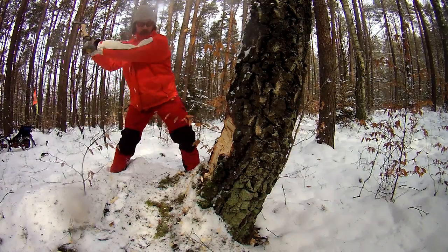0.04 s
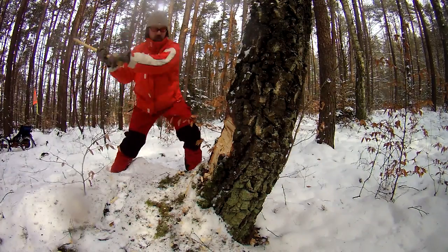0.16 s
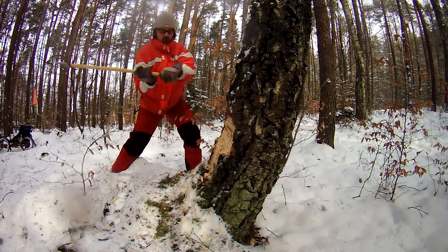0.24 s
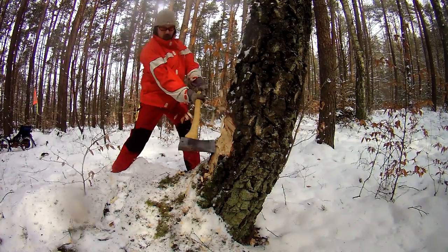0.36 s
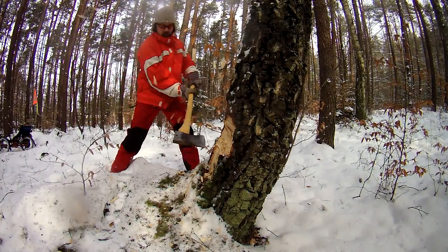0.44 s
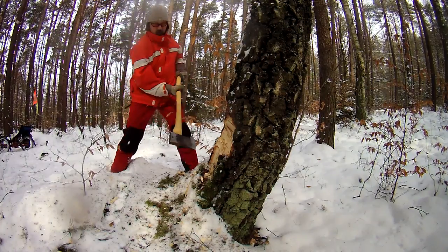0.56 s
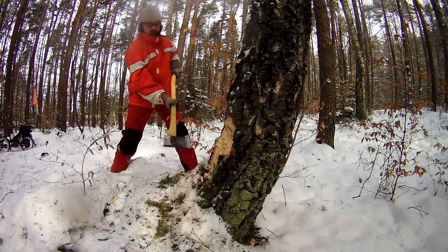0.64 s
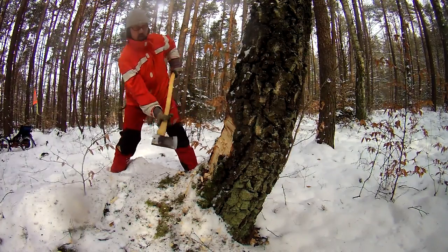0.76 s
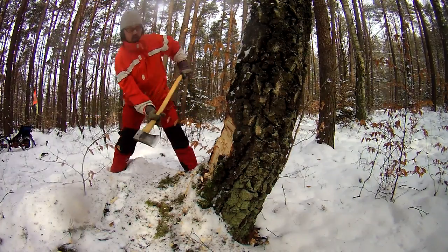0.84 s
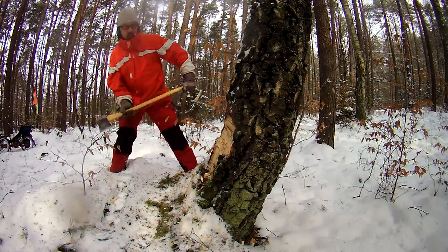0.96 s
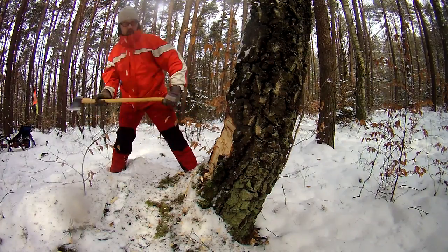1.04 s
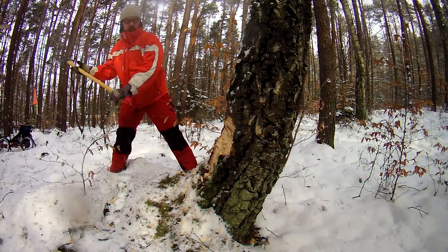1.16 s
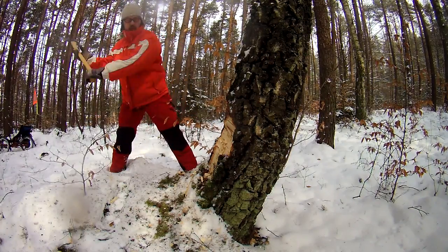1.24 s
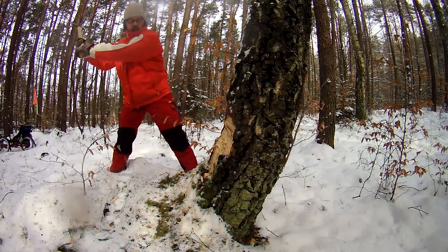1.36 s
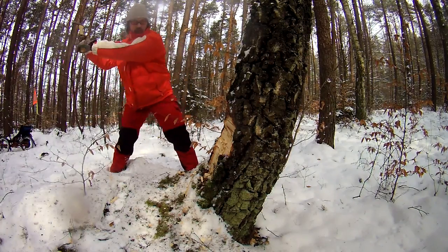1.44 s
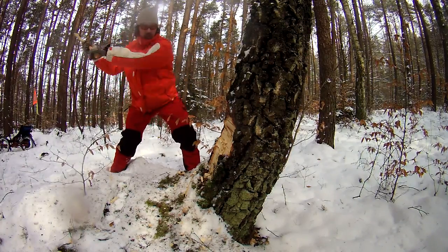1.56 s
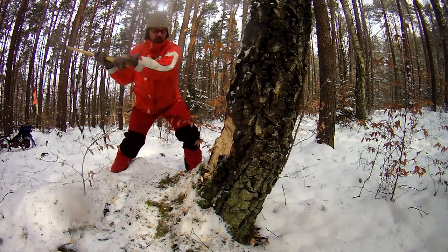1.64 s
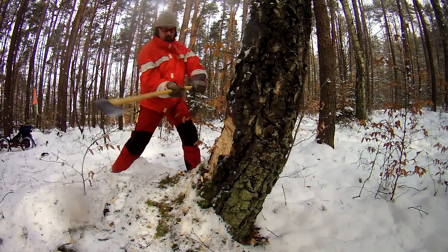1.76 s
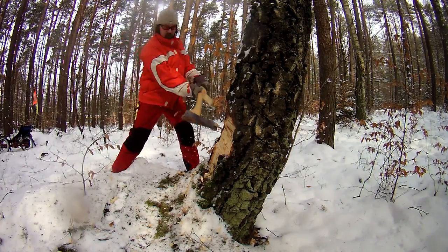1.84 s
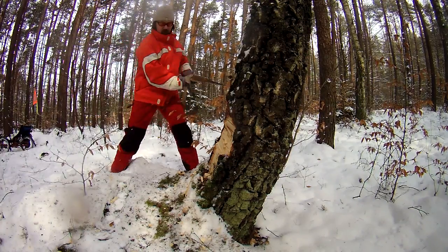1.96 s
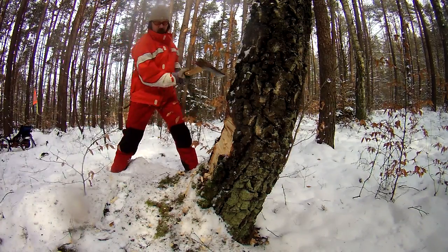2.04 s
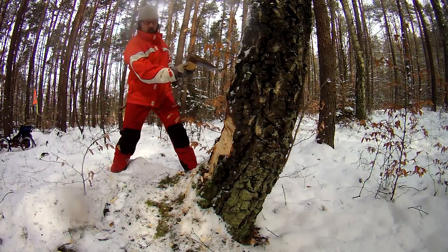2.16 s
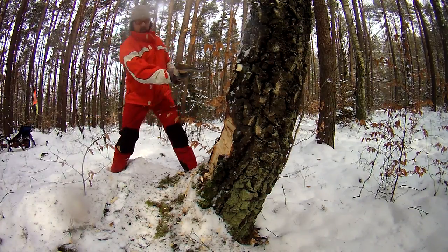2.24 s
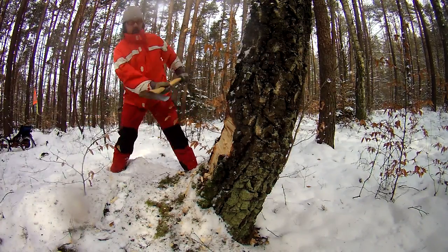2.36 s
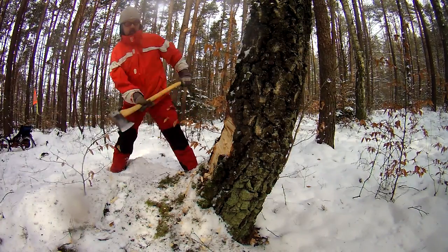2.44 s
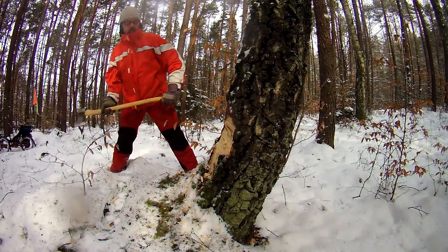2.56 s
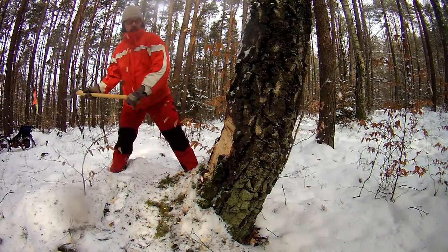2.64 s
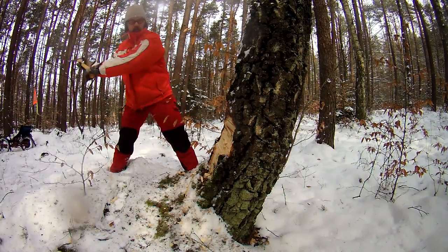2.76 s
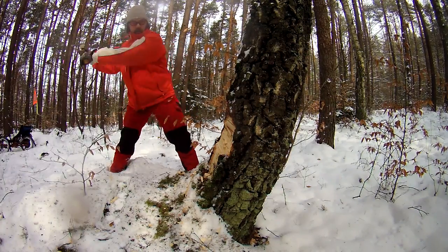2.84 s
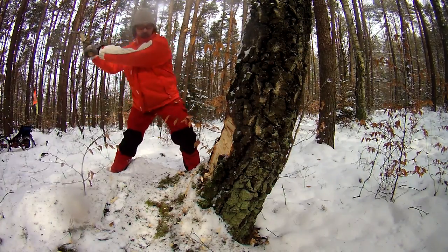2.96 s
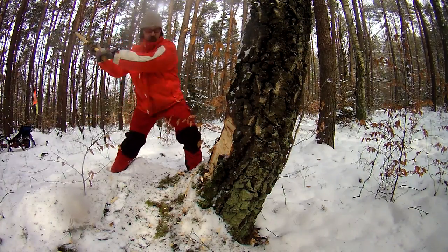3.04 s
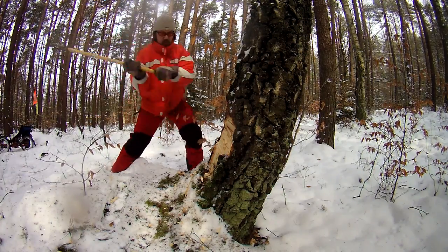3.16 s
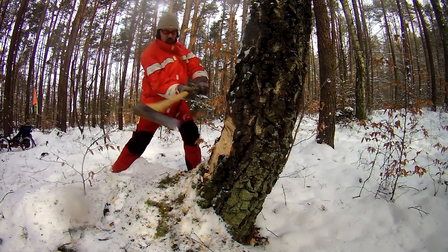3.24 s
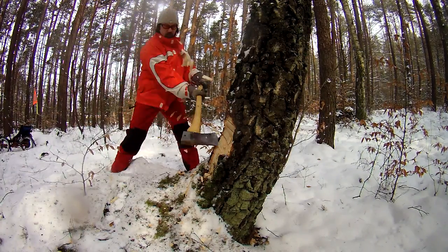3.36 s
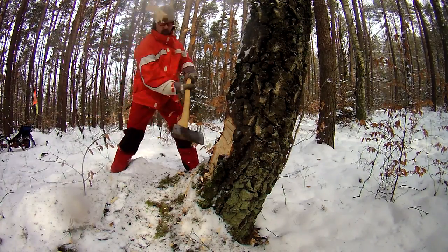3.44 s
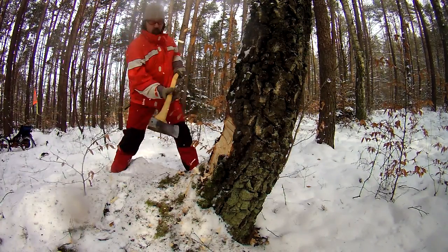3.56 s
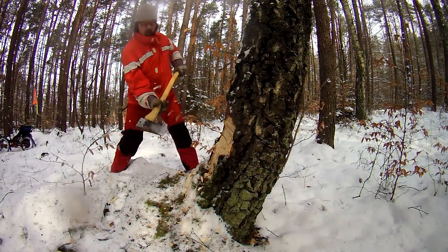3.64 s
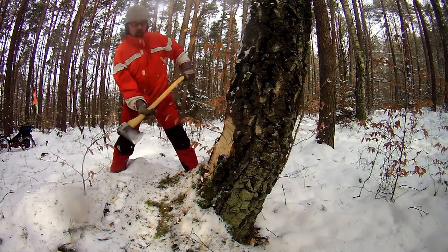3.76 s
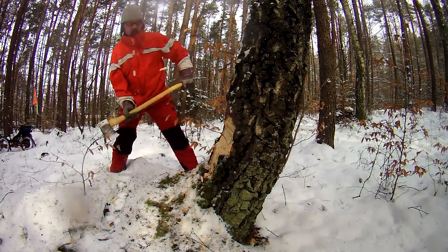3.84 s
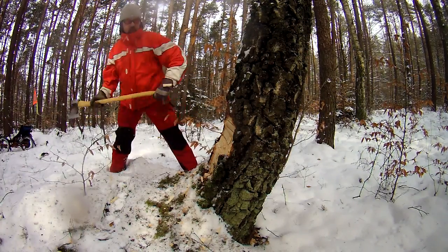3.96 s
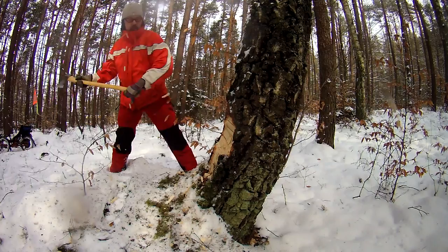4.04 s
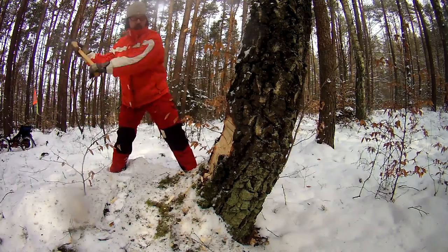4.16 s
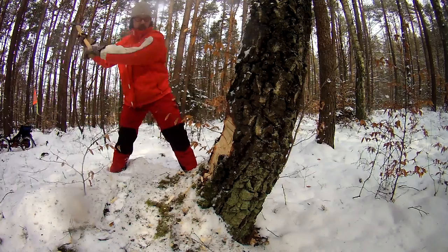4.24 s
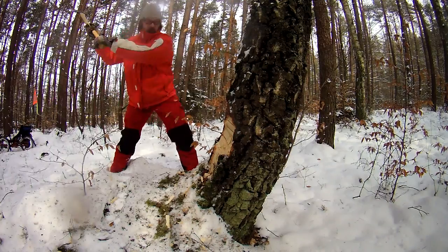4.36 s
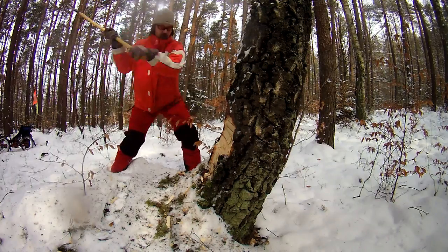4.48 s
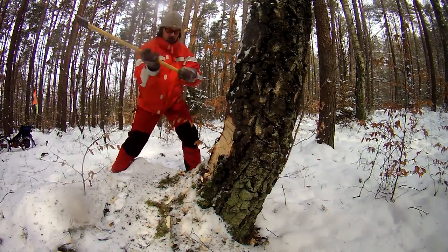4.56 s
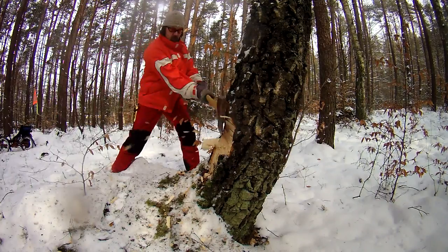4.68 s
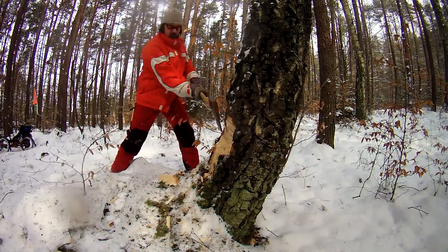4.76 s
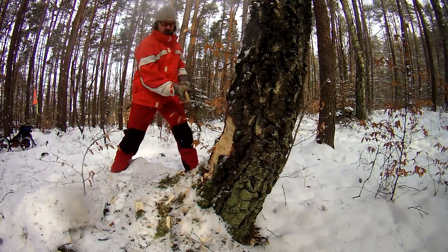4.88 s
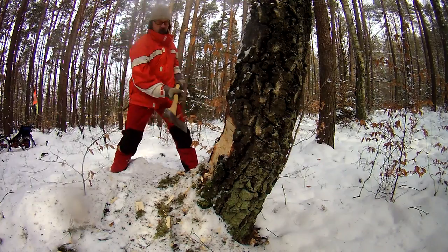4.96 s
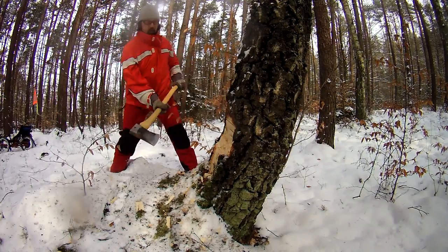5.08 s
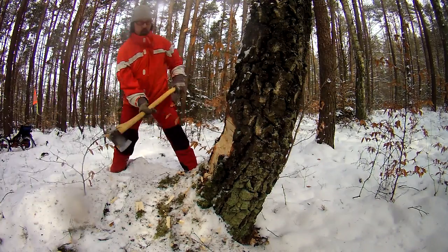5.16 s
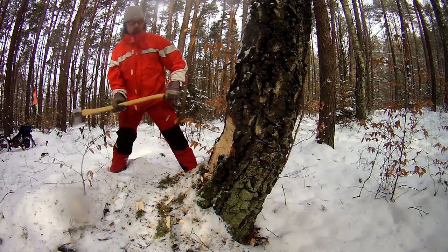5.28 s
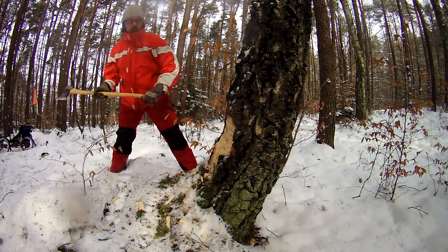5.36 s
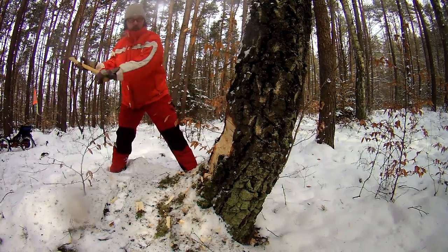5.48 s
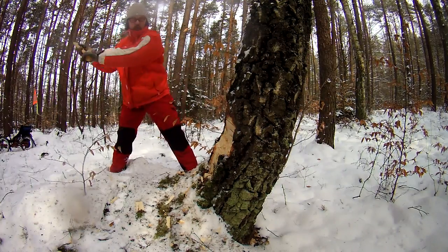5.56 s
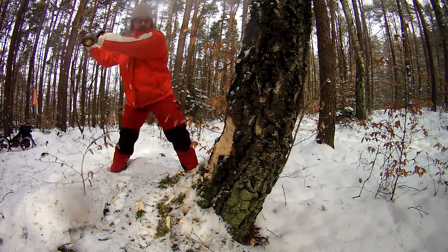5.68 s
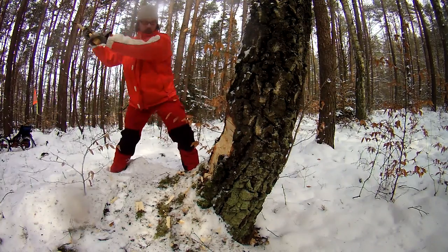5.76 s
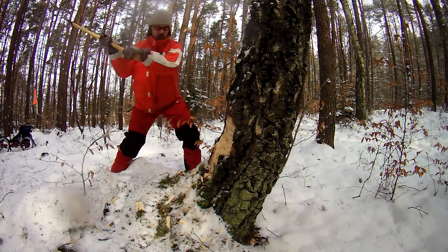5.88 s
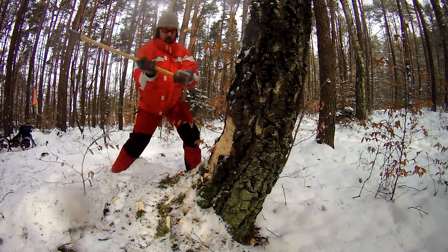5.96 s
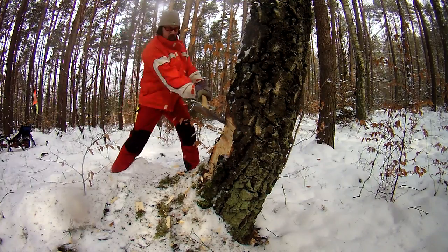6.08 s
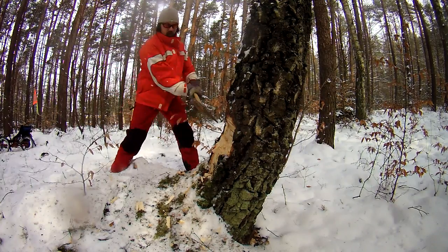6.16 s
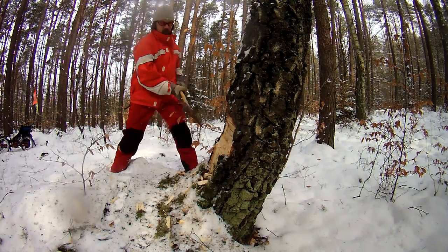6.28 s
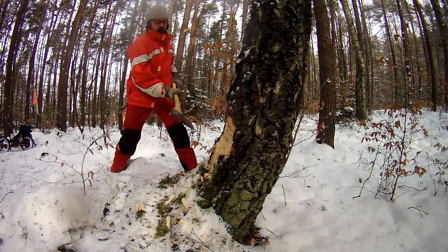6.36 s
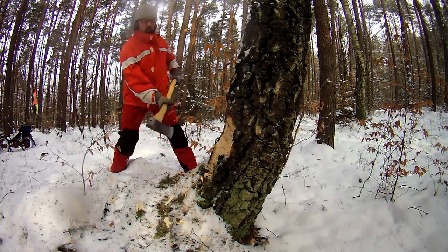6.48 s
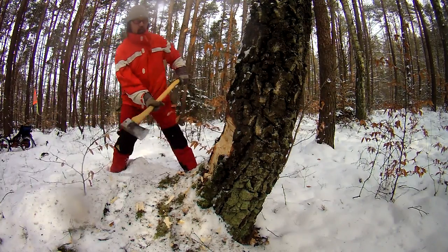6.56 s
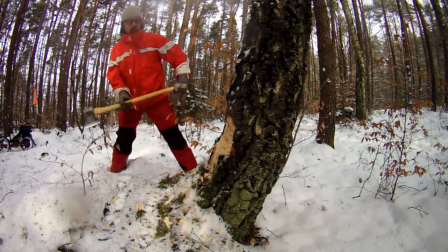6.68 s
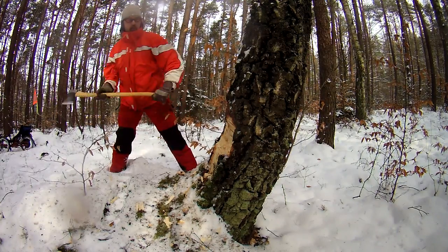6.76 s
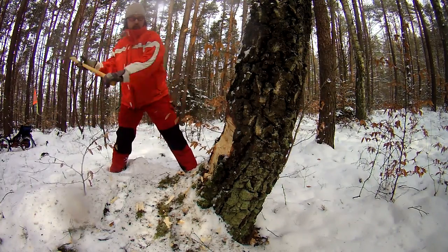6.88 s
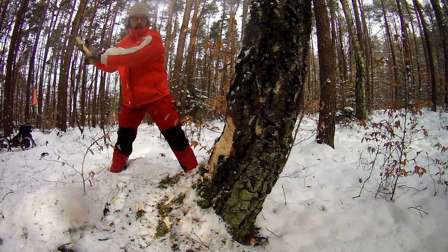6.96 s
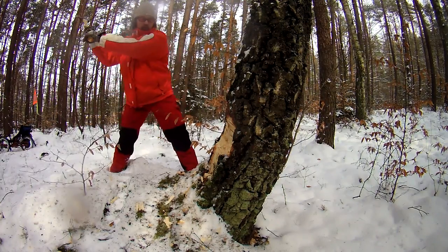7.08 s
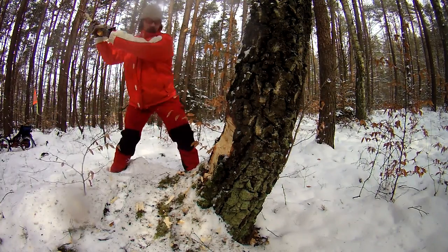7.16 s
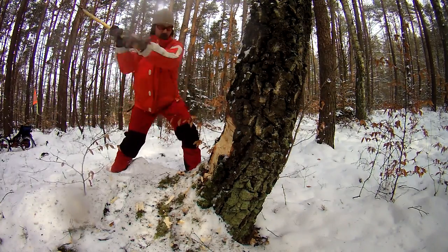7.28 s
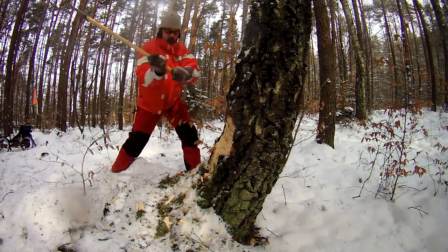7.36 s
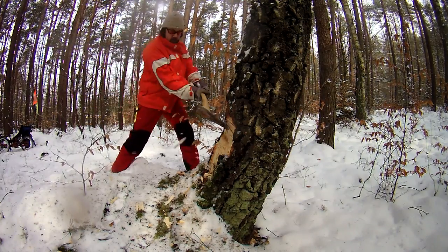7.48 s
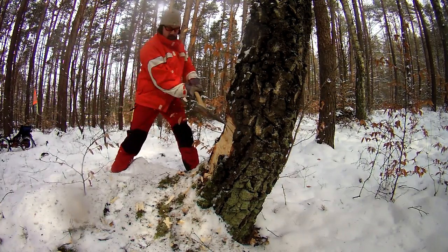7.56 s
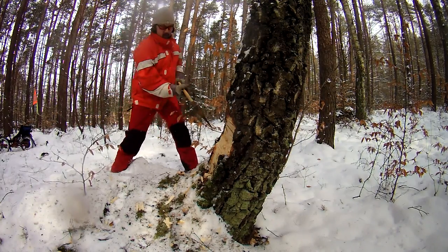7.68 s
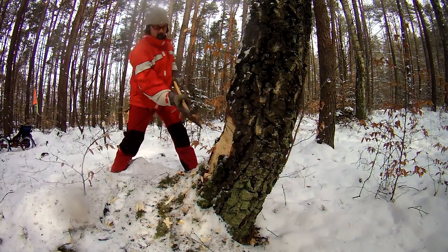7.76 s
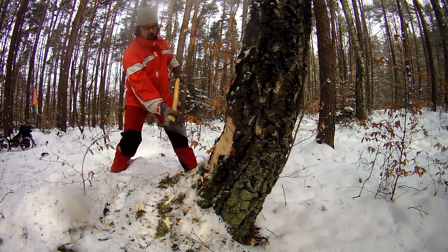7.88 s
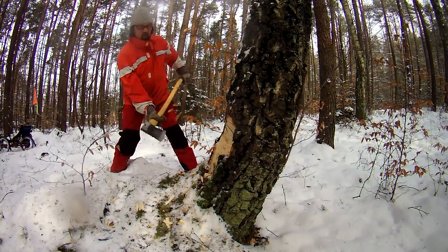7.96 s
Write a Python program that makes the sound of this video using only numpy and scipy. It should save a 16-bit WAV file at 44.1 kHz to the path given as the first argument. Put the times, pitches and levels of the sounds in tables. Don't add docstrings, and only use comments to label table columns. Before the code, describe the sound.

In a quiet snowy wood, an axe chops a standing trunk six times, roughly every one and a half seconds. Each blow is a very loud, dry crack with a short woody ring and low thud, overloading a nearby small camera in a hard housing. A faint scattered echo fades among the trees. Between blows, chips tick, cloth rustles softly, and low wind and a distant engine hum remain.

```python
import sys
import numpy as np
from scipy import signal
from scipy.fft import rfft, irfft
from scipy.io import wavfile
from scipy.ndimage import uniform_filter1d

SR = 44100
rng = np.random.default_rng(int(sys.argv[2]) if len(sys.argv) > 2 else 0)


def undo_db(level):
    steps = np.asarray(level, float) / 20
    return 10 ** steps


def int16_out(signal):
    q = np.round(np.clip(np.atleast_2d(signal).T, -1, 1) * 32767)
    wavfile.write(sys.argv[1], SR, q.astype(np.int16))


N = 353770
TIME = np.arange(N) / SR

# start in seconds, ring level in dB, crack level in dB, splinter level in dB,
# bite length in ms.
AXE_BLOWS = [
    (0.36, 4.5, 12, -12.5, 1.83),
    (1.8262, 7.5, 3.5, -17, 2.2),
    (3.2863, 4, 8.5, -14.5, 2.02),
    (4.6672, 4, 2, -14, 4.75),
    (6.0680, 4.5, 7, -25.5, 2.52),
    (7.4703, 7.5, 10, -9.5, 2.6),
]


def unit(x):
    return x / np.sqrt(np.mean(x ** 2))


def peak(x):
    return x / np.max(np.abs(x))


def colour(x, table):
    hz, db = np.transpose(table)
    log_hz = np.log(np.arange(len(x) // 2 + 1) * SR / len(x) + 1)
    return irfft(rfft(x) * undo_db(np.interp(log_hz, np.log(hz), db)), len(x))


def band(x, hz, width):
    return signal.lfilter(*signal.iirpeak(hz, hz / width, SR), x)


def ring(hz, t60, lag=0., size=SR // 2):
    t = np.maximum(np.arange(size) / SR - lag, 0)
    return np.sin(2 * np.pi * hz * t) * undo_db(-60 * t / t60) * (1 - np.exp(-t * hz))


def walk(rate, size=N):
    hold = int(SR / rate)
    steps = np.clip(rng.standard_normal(size // hold + 1), -2, 2)
    slewed = uniform_filter1d(np.repeat(steps, hold), hold)
    return 1.3 * uniform_filter1d(slewed, hold)[:size]


def bell(s, spread):
    return np.exp(-.5 * ((TIME - s) / spread) ** 2)


def add(out, s, x):
    i = int(s * SR)
    out[i:i + len(x)] += x[:N - i]


def axe():
    # mode in Hz, level in dB, t60 in seconds.
    notches = [
        [(913, -0.5, .032), (1100, -0.5, 0.042), (765, -9, 0.024), (355, -9.5, 0.043), (5740, -15.5, .008)],
        [(929.5, 1, 0.034), (1169, -3, .028), (330, -18, .06), (1700, -8, 0.021), (2600, -18.5, 0.012),
         (3890, -21.5, 0.0064)],
        [(911.5, 2, .029), (1104, 0, 0.027), (1478, -10.5, 0.022), (592, -9.5, 0.012), (4197, -18, .022)],
        [(451.7, -12.5, 0.02), (850, -6, 0.012), (610, -11.5, 0.025), (324.5, -11, 0.036), (3730, -13, .012),
         (1856, 0.5, 0.031), (1130, -9, 0.028), (4500, -11, 0.009)],
        [(916, 0.5, 0.035), (465, -7.5, 0.012), (1470, 5.5, 0.01), (1953, -2.5, 0.018), (4440, -15.5, 0.019)],
        [(910, 0.9, 0.031), (1208, -3.5, 0.037), (1592, -3, 0.031), (2020, -1, 0.032), (2473, -2.5, 0.023),
         (423, -10.5, .018), (4170, -14.5, 0.0086)],
    ]
    # echo level in dB, centre in Hz, width in octaves, near-trunk share 0-1.
    echoes = [
        (-33.5, 1200, 1.01, 0.8),
        (-35.5, 920, 0.64, 0.8),
        (-35, 1100, 0.9, 0.7),
        (-37.5, 2400, 1.4, 1.04),
        (-40, 1600, 1.3, 0.9),
        (-33, 1620, 0.77, 0.9),
    ]
    # centre in Hz, width in Hz, level in dB.
    lingering = [
        [(900, 150, -0.5), (2700, 400, -1), (4400, 500, -5.5)],
        [(1210, 300, 3.5), (900, 150, -1.5), (4305, 400, -6)],
        [(1070, 170, 7.5), (2767, 350, 3.5), (4200, 550, 2.5)],
        [(1900, 180, 2.5), (2600, 400, -7), (4770, 600, 4)],
        [(1350, 380, -1), (2730, 400, -1), (4587, 500, 7)],
        [(1730, 350, 4.5), (2493, 290, -7), (4600, 500, -2)],
    ]
    out, t = np.zeros(N), TIME[:1500]
    for blow, (echo_db, *echo), notch, linger in zip(AXE_BLOWS, echoes, notches, lingering):
        s, ring_db, crack_db, splinter_db, bite_ms = blow
        attack = (1 - np.exp(-t / 0.00051)) ** 2
        bite = attack * np.exp(-t * 1000 / bite_ms) / (1 + (t * 400 / bite_ms) ** 4)
        snaps, fibres = rng.standard_normal((2, len(t))) * bite
        body = 0
        for hz, db, t60 in notch:
            body = body + undo_db(db) * peak(signal.fftconvolve(snaps, ring(hz, t60, size=4000)))
        crack = band(band(fibres, 1880, 750), 1880, 1200)
        splinters = band(band(fibres, 3500, 5000), 5000, 7000)
        add(out, s, undo_db(ring_db) * peak(body))
        add(out, s, undo_db(crack_db) * peak(crack))
        add(out, s, undo_db(splinter_db) * peak(splinters))
        add(out, s, undo_db(echo_db) * wood(linger, *echo))
    return out


def wood(linger, centre_hz, octaves, near):
    # delay in seconds, spread in seconds, level in dB.
    near_trunks = [
        (0.023, .004, 9),
        (0.039, .01, 2),
        (.08, .008, -2),
    ]
    # band in Hz, t60 in seconds.
    wood_fade = [(700, 1.45), (1850, 1.27), (4500, 0.8), (7000, .3), (10000, .15)]
    # frequency in Hz, level in dB.
    housing_curve = [(240, -40), (400, -6.5), (493, -9.5), (580, -20.5), (725, -20), (893, -8),
                     (1130, -6.5), (1220, -7.5), (2250, -9.5), (2610, -6), (3780, -25.5), (4450, -24.5),
                     (5570, -32.5), (14000, -51)]
    t = TIME[:int(1.4 * SR)]
    fade_hz, fade_t60 = np.transpose(wood_fade)
    clusters = 1 + near * sum(undo_db(db) * np.exp(-.5 * ((t - s) / w) ** 2) for s, w, db in near_trunks)
    broad = []
    for hz in 600 * 2 ** (np.arange(14) / 3):
        off_centre = np.log2(hz / centre_hz) / octaves
        broad.append((hz, hz / 4.1, max(-5.5 * off_centre ** 2, -9.5)))
    out = 0
    for hz, width, db in broad + linger:
        fade = undo_db(db - 60 * t / np.interp(np.log(hz), np.log(fade_hz), fade_t60))
        lumps = undo_db(3.5 * walk(70, len(t)))
        out = out + fade * lumps * band(rng.standard_normal(len(t)), hz, width)
    onset = (1 + 3 * np.exp(-t / 0.007)) * np.clip(t / 0.0065, 0, 1)
    return colour(out, housing_curve) * clusters * onset * 3.9


def trunk():
    # start in seconds, squareness 0-1.
    thuds = [
        (.3601, 1),
        (1.8264, 1),
        (3.2874, 1),
        (4.6670, 0),
        (6.0687, 1),
        (7.4715, 1),
    ]
    # mode in Hz, level in dB, t60 in seconds, arrival in ms.
    soil_modes = [(89, -15, .2, 4.8), (232, -17, .105, 13.1), (274, -33, .16, 15.7),
                  (82.6, -17.3, .26, 19.1), (138.3, -7.3, .145, 20.1), (56.7, -22, .33, 24.6),
                  (69, -17, .16, 25.1), (138.4, -15.7, .2, 31), (191, -34, .16, 44.4)]
    out = np.zeros(N)
    wave = sum(undo_db(db) * ring(hz, t60, ms / 1000) for hz, db, t60, ms in soil_modes)
    for s, square in thuds:
        glance = 1 - square
        thud = ring(207 - 32 * glance, .025)
        add(out, s + glance * .0095, undo_db(13 - 4 * glance) * thud)
        add(out, s, undo_db(-5 * glance) * wave)
    return out


def tick(out, s, db, hz, ms, edge_db):
    t = TIME[:2600]
    snaps = rng.standard_normal(len(t)) * np.exp(-t * 1000 / ms)
    muffle = signal.butter(3, (850, max(3000, 1.3 * hz)), "band", fs=SR)
    housing = band(band(snaps, 1300, 600), 1300, 600) + band(band(snaps, 2500, 340), 2100, 900)
    body = band(band(snaps, hz, 0.72 * hz), hz, 1.2 * hz) + 0.4 * housing
    edge = band(band(snaps * np.exp(-t / 0.0014), 4600, 5000), 4500, 8000)
    add(out, s, undo_db(db + 1.0) * peak(signal.lfilter(*muffle, body)))
    add(out, s, undo_db(db + edge_db) * peak(edge))


def chips():
    # start in seconds, peak level in dB, centre in Hz, length in ms.
    landings = [(.3590, -8.5, 1200, 0.69), (.812, -42.5, 1720, 1.2), (.9938, -31, 1990, 2.1),
                (1.2143, -19.5, 1730, 1.8), (1.2207, -18, 2020, 1.19), (1.288, -33.5, 1350, 4.5),
                (1.3468, -27, 2140, 4.2), (1.349, -25, 1130, 2.1), (1.3704, -39, 1590, 1.4),
                (1.3867, -39, 1550, 1.8), (1.419, -54, 2640, 1.5), (1.4556, -44, 1630, 2.8),
                (1.8253, -5, 3600, 1.3), (4.3444, -45, 2600, 1.5), (5.459, -43.5, 1430, 1.52),
                (7.1534, -41.5, 1394, 2.5), (7.494, -22.5, 2000, 2.3), (7.552, -25.5, 1610, 5.4)]
    out = np.zeros(N)
    for s, db, hz, ms in landings:
        tick(out, s, db, hz, ms, edge_db=-20)
    return out


def twigs():
    # start in seconds, peak level in dB, centre in Hz, length in ms.
    twig_snaps = [(.605, -49, 4500, .7), (.915, -36, 2000, 1.6), (1.565, -34, 2580, 2.6),
                  (1.574, -43, 2700, 15), (1.5982, -42, 2600, 2.12), (3.9848, -46.5, 2570, 2.3),
                  (4.0838, -48, 1880, 1.53), (4.3938, -47, 1880, 2.1), (4.421, -39, 2400, 1.4),
                  (7.533, -37.5, 5150, 0.74), (7.539, -31, 2100, 4.5), (7.62, -47, 5000, .93)]
    out = np.zeros(N)
    for s, db, hz, ms in twig_snaps:
        tick(out, s, db, hz, ms, edge_db=-6.5)
    return out


def swish():
    swing_levels = [-55.5, -60, -59.5, -70, -58.5, -61]
    lead_s, spread_s, centre_hz = .105, 0.02, 1050
    air_cut = unit(band(band(rng.standard_normal(N), centre_hz, 500), centre_hz, 700))
    return air_cut * sum(undo_db(db) * bell(s - lead_s, spread_s) for (s, *_), db in zip(AXE_BLOWS, swing_levels))


def jacket():
    # resonance in Hz, width in Hz, level in dB.
    cloth_bands = [
        (1230, 900, 0.5),
        (2600, 150, -6.5),
        (4499, 1900, -19),
    ]
    effort_levels = [-69.5, -62, -66, -63, -67.5, -65]
    rest_db, wind_up_s, rise_s, swing_drop_db = -69.5, .3, 0.12, -3.5
    flutter = undo_db(3.1 * walk(330) + 1.5 * walk(25))
    cloth = 0
    for hz, width, db in cloth_bands:
        grains = flutter * rng.standard_normal(N)
        cloth = cloth + undo_db(db + 0.9 * walk(17)) * band(band(grains, hz, width), hz, width)
    level = undo_db(rest_db)
    for (s, *_), db in zip(AXE_BLOWS, effort_levels):
        swing = undo_db(swing_drop_db) * (TIME > s - wind_up_s) * (TIME < s)
        level = level + undo_db(db) * np.maximum(bell(s - wind_up_s, rise_s), swing)
    return unit(cloth) * uniform_filter1d(level, size=2001)


def wind():
    # time in seconds, peak level in dB, spread in seconds.
    gusts = [
        (.05, -60, 0.043),
        (.92, -51, 0.06),
        (1.29, -38, 0.055),
        (2.38, -45, 0.037),
        (5.95, -46, 0.059),
        (7.45, -50, 0.088),
    ]
    low = colour(rng.standard_normal(N), [(6, -21), (18, 15.0), (35, 8.5), (60, -45.5), (150, -90)])
    turbulence = unit(low) * undo_db(2.3 * walk(11.0))
    return turbulence * (undo_db(-52.5) + sum(undo_db(db) * bell(s, w) for s, db, w in gusts))


def far_engine():
    # time in seconds, pitch in Hz, level in dB.
    engine_path = [(2.3, 111.1, -67), (3.199, 108.6, -59), (4.102, 110.9, -59), (4.7, 109.5, -58.5),
                   (5.1, 108.4, -53), (5.901, 108.6, -49), (6.701, 109.6, -49), (7.299, 108.5, -56.5),
                   (7.699, 109, -59.5), (8.02, 109.8, -49)]
    s, hz, db = np.transpose(engine_path)
    level = undo_db(np.interp(TIME, s, db, left=-90) + 0.5 * walk(7.8))
    phase = 2 * np.pi * np.cumsum(np.interp(TIME, s, hz)) / SR
    return np.sqrt(2) * level * np.sin(phase)


def air():
    # frequency in Hz, level in dB per Hz.
    rumble_curve = [(26, -40.5), (45, -0.5), (79, -3.5), (112, -4.5), (170, -9.5), (291, -13.5), (442, -20),
                    (525, -22.5), (798, -27.5), (1370, -32.5), (2300, -32.5), (2600, -33.5), (3570, -43.5),
                    (4800, -44), (16000, -55)]
    rumble = unit(colour(rng.standard_normal(N), rumble_curve))
    return undo_db(-49) * rumble + undo_db(-72) * rng.standard_normal(N)


def scene():
    work = axe() + trunk() + chips() + twigs() + swish() + jacket()
    return (work + wind() + far_engine() + air())[None]


def roll_off(x):
    return signal.sosfilt(signal.butter(12, 16750, fs=SR, output="sos"), x)


def record(dry):
    clipped = np.clip(dry, -1.003, 1.003)
    top_cut = signal.ellip(8, .2, 60, 15700, fs=SR, output="sos")
    return roll_off(signal.sosfilt(top_cut, clipped))


dry = scene()
out = record(dry)
int16_out(out)
```